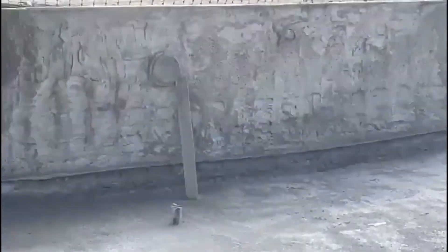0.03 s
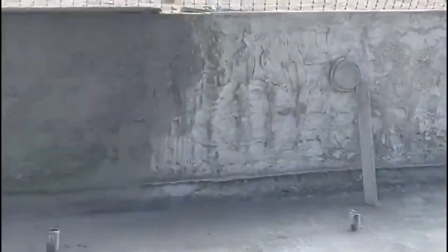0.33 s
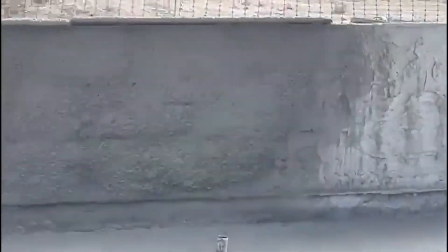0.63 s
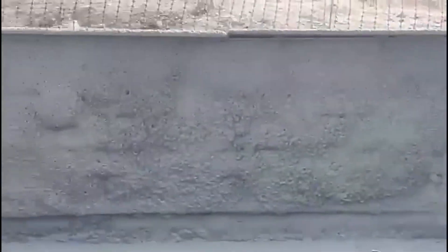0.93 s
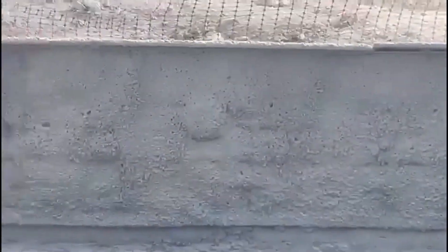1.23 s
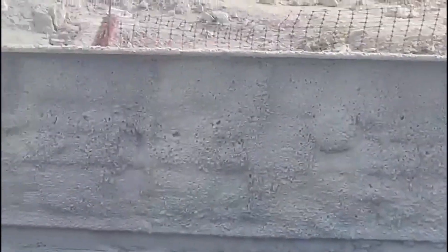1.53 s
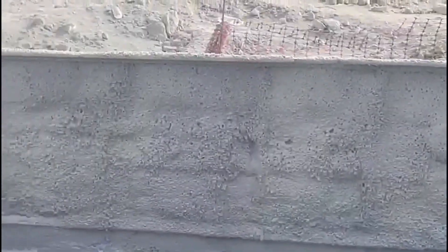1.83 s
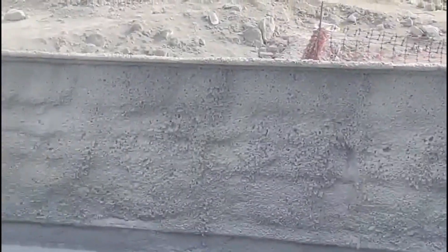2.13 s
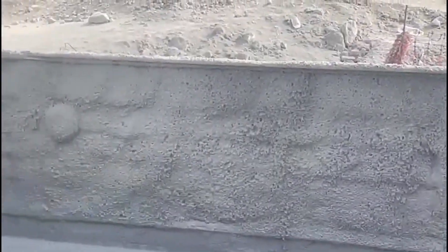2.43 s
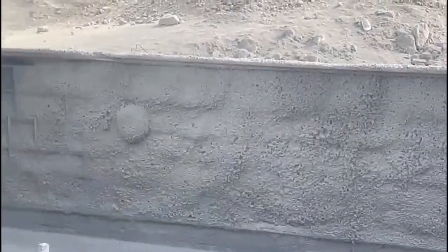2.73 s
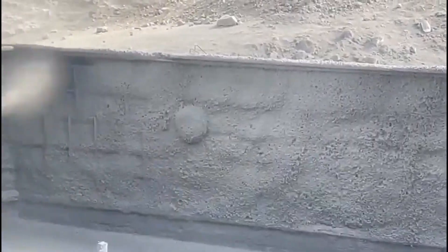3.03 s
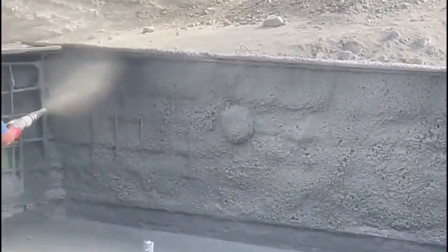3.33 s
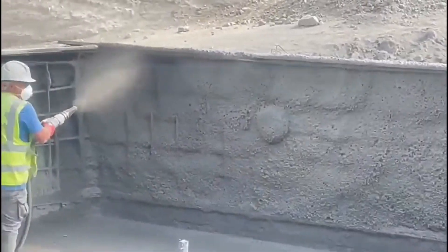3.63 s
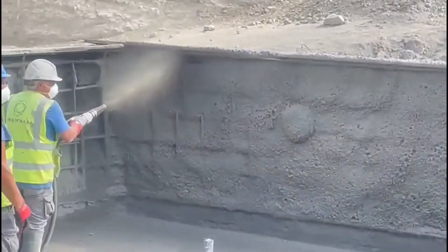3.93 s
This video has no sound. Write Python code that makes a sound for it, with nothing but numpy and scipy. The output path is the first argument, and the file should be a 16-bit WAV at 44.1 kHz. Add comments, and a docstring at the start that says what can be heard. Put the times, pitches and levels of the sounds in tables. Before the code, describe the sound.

Wet concrete sprays from a hose onto a wall in an outdoor pit, roaring and hissing. Lumps spit out with thuds, grit patters and the nozzle briefly whistles over a droning rig as the microphone turns towards it.

```python
"""In a pit, wet concrete is sprayed on a wall while the listener turns towards the nozzle.
The jet of air rumbles, roars and hisses, and makes the nozzle ring and whistle; the rig drones behind.
Wet mix churns through the hose and bursts out in lumps, each a quickly falling, thudding spit.
Grit patters and scuffs, clumps slap on the wall, and the pit throws the roar and the spits back."""
import sys
import numpy as np
from scipy import signal
from scipy.fft import rfft, irfft
from scipy.io import wavfile
from scipy.ndimage import uniform_filter1d, map_coordinates

SR = 44100
rng = np.random.default_rng(int(sys.argv[2]) if len(sys.argv) > 2 else 0)


def waveform_to_disk(signal):
    """Save audio, clipped to [-1, 1], as 16-bit WAV at the path in sys.argv[1]."""
    frames = np.transpose(np.atleast_2d(signal))
    scaled = np.clip(frames, -1, 1) * 32767
    samples = np.round(scaled).astype(np.int16)
    wavfile.write(sys.argv[1], SR, samples)


N = 176400
T = np.arange(N) / SR
HZ = np.fft.rfftfreq(N, 1 / SR)


def amp(db):
    """Turns decibels into a number to multiply a sound by."""
    return 10 ** (np.asarray(db) / 20)


def unit(x):
    """Scales a signal to an average strength (rms) of 1."""
    return x / np.sqrt(np.mean(x ** 2) + 1e-20)


def curve(table, column=1):
    """Joins the points in one column of a time table with straight lines."""
    rows = np.array(table)
    return np.interp(T, rows[:, 0], rows[:, column])


def add(mix, start_s, sound):
    """Mixes a sound in at its start time."""
    part = mix[max(round(start_s * SR), 0):][:len(sound)]
    part += sound[:len(part)]


def delay(x, ms):
    """Makes a sound arrive later."""
    return np.interp(T - ms / 1000, T, x)


def noise(gains):
    """Noise with a chosen share of each frequency."""
    return unit(irfft(rfft(rng.standard_normal(N)) * gains, N))


def wander(rate_hz):
    """A random wobble, up to about the given speed."""
    return noise(1 / (1 + (HZ / rate_hz) ** 4))


def band(hz, half_width_hz):
    """Noise gathered around one pitch."""
    return noise(1 / (1 + ((HZ - hz) / half_width_hz) ** 2))


# Pitches that the hose and pit boost or weaken (frequency [Hz], width [Hz], boost [dB])
RESONANCES = [(422, 58, 2.5), (548, 25, 4), (630, 91, 4.5), (804, 32, 2.5), (969, 45, 6),
              (1104.4, 28.5, 9.5), (1276, 44, 4.5), (1305, 42, 5), (1397, 120, -3.5), (1850, 97, -5),
              (2077, 46, -7), (2554, 100, 4.5), (3790, 140, 0), (4030, 140, -1.5), (5350, 140, 1)]
def colour(x, tone):
    """Shapes a sound by a tone table and by the hose and pit; its strength comes out as 1."""
    hz, db = np.transpose(tone)
    tone_db = np.interp(np.log(HZ + 1), np.log(hz), db)
    boost_db = sum(boost / (1 + (2 * (HZ - centre) / width) ** 2) for centre, width, boost in RESONANCES)
    return unit(irfft(rfft(x) * amp(tone_db + boost_db), N))


def rush(tone, shape=N):
    """Rushing noise in a given tone; shape (2, N) gives each ear its own."""
    return colour(rng.standard_normal(shape), tone)


def feed(slowest_hz=3.3, fastest_hz=48.3):
    """The mix comes through the hose in quick, uneven surges."""
    return noise(HZ ** 2 / (HZ ** 2 + slowest_hz ** 2) / (1 + (HZ / fastest_hz) ** 4))


# How strongly the jet flows (time [s], level change [dB])
FLOW = [(0, -2), (.35, -2), (.6, -0.5), (.95, -1), (1.25, 2), (1.45, 0), (1.7, 0.5), (2.05, 0.5),
        (2.16, -5), (2.35, 2.5), (2.68, 2.5), (2.85, -6.5), (3.15, -5.5), (3.35, -7.5), (3.53, 3),
        (3.7, -10), (4, -6)]
# Tone of the swirling air (frequency [Hz], relative level [dB])
RUMBLE_TONE = [(40, -36.5), (80, -0.5), (120, -2.5), (155, -2), (205, -1), (250, -9), (300, -24),
               (500, -37.5), (1500, -104)]
def rumble(level_db=-22.5, lumpy_db=2.06, side_db=-17, side_hz=170):
    """Swirling air rumbles with the flow; its higher part spreads out to both sides."""
    middle, side = rush(RUMBLE_TONE), rush(RUMBLE_TONE)
    spread = np.minimum((HZ / side_hz) ** 2, 5) * amp(side_db)
    side = irfft(rfft(side) * spread, N)
    return np.array([middle + side, middle - side]) * amp(level_db + curve(FLOW) + lumpy_db * wander(18))


# Deep gusts under the jet (time [s], level [dB])
GUST_LEVEL = [(0, -30.5), (.15, -28.5), (.27, -28.5), (.42, -28.5), (.58, -21), (.8, -24.5), (1.07, -32.5),
              (1.22, -22), (1.42, -24), (1.58, -26.5), (1.67, -16.5), (1.9, -33.5), (2.0, -24), (2.13, -23),
              (2.32, -19.5), (2.48, -23), (2.68, -12), (2.8, -37.5), (3.1, -26.5), (3.35, -27.5),
              (3.55, -21.5), (3.8, -27.5), (4, -27)]
# Tone of the gusts (frequency [Hz], relative level [dB])
GUST_TONE = [(20, -44), (33, -48.5), (50, -30), (65, -12.5), (90, -0.5), (120, 0), (150, -4.5), (200, -7.5),
             (400, -127)]
def gusts(lumpy_db=0.5):
    """Deep, lumpy air noise, the same in both ears."""
    return rush(GUST_TONE) * amp(curve(GUST_LEVEL) + lumpy_db * wander(25))


# The note of the rig (time [s], level [dB], pitch [Hz])
RIG_NOTE = [(0, -29.5, 177.7), (.16, -27, 180.2), (.23, -25.5, 179.5), (.41, -22.5, 179.6),
            (.52, -31, 183.6), (.9, -30, 180), (1.1, -24.5, 180.7), (1.32, -21.5, 186), (1.45, -28, 181.9),
            (1.59, -25.5, 189.9), (1.75, -29, 181.8), (2.05, -24.5, 179.7), (2.17, -37, 180),
            (2.6, -25.5, 177.3), (2.85, -36, 180.5), (3.1, -30, 183.3), (4, -31.5, 180)]
def rig_drone(waver=0.00754, overtone_db=-24.5, flutter_db=-0.5):
    """The rig hums a wavering low note, with a faint overtone at three times the pitch."""
    hz = curve(RIG_NOTE, column=2) * (1 + waver * wander(4.6))
    angle = 2 * np.pi * np.cumsum(hz) / SR
    hum = unit(np.sin(angle) + amp(overtone_db) * np.sin(3 * angle))
    return hum * amp(curve(RIG_NOTE) + flutter_db * wander(18))


def sag(x, fall_per_s=0.006):
    """Lets the pitches in a noise sink slowly as the listener turns."""
    bent_time = T + fall_per_s * T * (T[-1] - T) / 2
    return map_coordinates(x, [SR * bent_time], order=5, mode="mirror")


# High notes of the nozzle pipe (pitch [Hz], half-width [Hz], level [dB])
PIPE_NOTES = [(2965, 55, -47.5), (3170, 65, -49.5), (3605, 50, -50.5)]
# How loud they are as the listener turns (time [s], level change [dB])
PIPE_LEVEL = [(0, -5.5), (1, -6), (1.8, -2.5), (2.9, -3.5), (4, -4.5)]
def pipe(flutter_db=2.0):
    """Air sings in the nozzle pipe, each note fluttering on its own."""
    notes = sum(band(hz, width) * amp(db + flutter_db * wander(25)) for hz, width, db in PIPE_NOTES)
    return sag(notes) * amp(curve(PIPE_LEVEL))


# Bounces off the walls near the nozzle (starting delay [ms], strength [share of the direct sound])
WALL_BOUNCES = [(3.1, 0.14), (5.7, 0.24), (9.4, 0.062), (15.2, 0.4), (23, 0.18)]
def walls(x, drift_per_s=0.01498):
    """Adds quick bounces whose paths slowly lengthen as the listener moves."""
    return unit(x + sum(share * delay(x, ms * (1 + drift_per_s * T)) for ms, share in WALL_BOUNCES))


# The listener's turn (time [s], left ear's lead [ms], roar boost [dB], left minus right [dB])
TURN = [(0, 0.41, 8, -1.5), (.5, 0.39, 7.5, 2), (1.1, 0.28, 8, 3), (1.6, 0.22, 9, 1.5),
        (2.3, 0.14, 7.5, 1.5), (3, 0.09, 5, -2), (3.38, 0.078, 5, 1), (3.55, 0.048, 8, -0.5),
        (4, 0.06, 6, -3.5)]
# Tone of the spray on the wall (frequency [Hz], relative level [dB])
ROAR_TONE = [(150, -18), (300, -1), (450, 0), (560, -6.5), (700, 7), (900, 6), (1100, -5), (1400, 5),
             (1800, -3), (2050, 0), (2300, -32.5), (4000, -78.5)]
# Tone of its echo in the pit (frequency [Hz], relative level [dB])
ECHO_TONE = [(150, -30.5), (300, -23.5), (450, 1.5), (560, -8.5), (680, 5), (900, -12), (1100, -2.5),
             (1350, -7), (1750, -5), (2000, -9), (2250, -18.5), (3000, -36.5), (4000, -82.5)]
# How that echo builds up (time [s], level change [dB])
ECHO_LEVEL = [(0, -1.5), (1.6, 0), (4, 0)]
def roar(surge, level_db=-40, surge_db=1.88, echo_db=-34.5, echo_surge_db=0.1):
    """Spray and clumps beat on the wall, reaching the left ear first; a wash of echo fills the pit."""
    spray = walls(rush(ROAR_TONE)) * amp(level_db + curve(TURN, column=2) + surge_db * surge)
    spray += slaps()
    pan = amp(curve(TURN, column=3) / 2)
    direct = np.array([spray * pan, delay(spray, ms=curve(TURN)) / pan])
    echo = rush(ECHO_TONE, (2, N)) * amp(echo_db + curve(ECHO_LEVEL) + echo_surge_db * surge)
    return direct + echo


# Churning inside the hose (time [s], level [dB])
CHURN_LEVEL = [(0, -37), (.7, -37), (1.2, -43.5), (1.6, -38.5), (2.1, -37.5), (2.4, -32), (2.7, -39),
               (2.85, -38), (3.35, -49), (3.52, -27), (3.7, -51), (4, -64)]
# Tone of wet mix (frequency [Hz], relative level [dB])
WET_TONE = [(100, -20.5), (200, 5), (330, 2), (480, 3), (750, -2.5), (1300, -13), (2000, -13),
            (4000, -76.5)]
def churn(surge, surge_db=2):
    """Wet mix churns out of the hose, louder with each surge."""
    return rush(WET_TONE, (2, N)) * amp(curve(CHURN_LEVEL) + surge_db * surge)


NOZZLE_HZ = 1336
# Hollow ring of the nozzle (time [s], level [dB])
RING_LEVEL = [(0, -64), (.55, -50), (.72, -44), (1.15, -46.5), (1.7, -46), (2.3, -40), (3, -48), (4, -57)]
def ring(surge, surge_db=2):
    """Rushing air makes the nozzle ring around one pitch."""
    return band(NOZZLE_HZ, half_width_hz=99) * amp(curve(RING_LEVEL) + surge_db * surge)


# Tone of the hiss and grit, with the recorder's treble gap at about 7.6-9.5 kHz
# (frequency [Hz], relative level [dB])
HISS_TONE = [(1000, -16.5), (1800, -11), (2150, 6), (2900, -1), (3800, -1.5), (5200, -5.5), (6400, -10.5),
             (7350, -15.5), (7800, -66.5), (9200, -48.5), (9900, -20.5), (11500, -25), (12500, -38)]
# Tone of the thin treble band that the recorder adds (frequency [Hz], relative level [dB])
RECORDER_TREBLE = [(5500, -56), (6700, -19.5), (7100, 6.5), (8200, 6.5), (9500, 2), (10200, -16.5),
                   (11000, -30.5)]
def hiss(surge, level_db=-43, surge_db=0.66, flicker_db=1.15, treble_db=-60):
    """Escaping air gives a flickering hiss; the recorder adds thin treble, opposite in the two ears."""
    air = walls(sag(rush(HISS_TONE))) * amp(level_db + surge_db * surge + flicker_db * wander(43))
    treble = amp(treble_db) * rush(RECORDER_TREBLE)
    return np.array([air + treble, air - treble])


def grit(grains_per_s=1700, level_db=-46, spread_db=1.5):
    """Grains patter on the wall, each a tiny click at a random moment."""
    hits = rng.random(N) < grains_per_s / SR
    strength = amp(spread_db * np.minimum(rng.exponential(1, N), 4))
    clicks = hits * strength * rng.choice([-1, 1], N)
    return amp(level_db) * colour(clicks, HISS_TONE)


def burst(t, rise_s, fade_s):
    """A loudness shape that rises quickly and dies away."""
    return (1 - np.exp(-t / rise_s)) * np.exp(-t / fade_s)


def spit(db, size, top_hz=1250, end_hz=116, fall_s=0.0035, hose_hz=180, swell_s=0.017, boom_db=-10):
    """A lump leaves the hose: a chirp drops to a thud, slower and deeper if big, and the hose booms."""
    t = T[:SR // 10]
    hz = (end_hz + (top_hz - end_hz) * np.exp(-t / (fall_s * size))) / size
    shape = burst(t, rise_s=0.003, fade_s=0.016)
    chirp = shape / shape.max() * np.sin(2 * np.pi * (np.cumsum(hz) / SR + rng.random()))
    roughness = 1 + 0.16 * unit(uniform_filter1d(rng.standard_normal(len(t)), size=40))
    swell = (t / swell_s * np.exp(1 - t / swell_s)) ** 2
    boom = swell * np.sin(2 * np.pi * (hose_hz * t + rng.random()))
    return amp(db) * (chirp * roughness + amp(boom_db) * boom)


def sputter(lumps_per_s=60, level_db=-33.5, spread_db=4, size_spread=0.15, count=400):
    """Small lumps spit out at random, louder when the flow is strong."""
    out, flow_db = np.zeros(N), curve(FLOW)
    times = np.cumsum(rng.exponential(1, count)) / lumps_per_s
    for s in times[times < T[-1]]:
        strength, bulk = np.clip(rng.standard_normal(2), -2, 2)
        db = level_db + np.interp(s, T, flow_db) + spread_db * strength
        add(out, s, spit(db, size=np.exp(size_spread * bulk)))
    return out


def pit_echo(x, fade_s=1, bass_hz=300):
    """The pit smears a sound into a short echo, alike in both ears in the bass."""
    t = T[:SR // 2]
    fade = amp(-60 * t / fade_s) * (t > .004)
    middle, side = rfft(rng.standard_normal((2, len(t))) * fade, N)
    spread = np.pi / 4 / (1 + (bass_hz / (HZ + 1)) ** 4)
    middle, side = middle * np.cos(spread), side * np.sin(spread)
    tail = irfft([middle + side, middle - side], N)[:, :len(t)]
    return signal.fftconvolve(x[None], tail / np.linalg.norm(tail[0]), axes=1)[:, :N]


def bump(peak_s, width_s):
    """A smooth rise and fall around one moment."""
    return np.exp(-.5 * ((T - peak_s) / width_s) ** 2)


def squeak(peak_s, hz, db, width_s, waver_hz, rasp=0):
    """A brief, unsteady tone that swells and fades; rasp mixes noise into it."""
    angle = 2 * np.pi * np.cumsum(hz + waver_hz * wander(waver_hz)) / SR
    return amp(db) * bump(peak_s, width_s) * unit(np.sin(angle) + rasp * band(hz, 2 * waver_hz))


# Gritty squeaks of the mix (time [s], pitch [Hz], level [dB])
SCUFFS = [(.275, 2000, -39.5), (.32, 1950, -40.5), (.395, 2430, -39.5), (.437, 2540, -38),
          (.482, 1680, -41), (1.045, 2520, -42), (1.675, 2540, -40), (1.975, 2520, -40), (3.05, 2200, -38),
          (3.25, 2170, -39)]
def scuffs():
    """Grit rasps briefly, part tone and part noise."""
    return sum(squeak(s, hz, db, width_s=0.0084, waver_hz=130, rasp=0.4) for s, hz, db in SCUFFS)


# Big lumps leaving the nozzle (time [s], level [dB], size [1 = ordinary])
BIG_LUMPS = [(0.675, -21.5, 0.97), (1.18, -21, 1.26), (1.292, -23, 1.3), (1.501, -14.5, 0.9),
             (1.628, -18.5, 1.25), (1.674, -21.5, 1.2), (2.199, -11.5, 1.1), (2.343, -20, 0.97),
             (2.37, -16, 0.85), (2.447, -13.5, 1), (2.571, -16, 1.2), (2.65, -16, 0.84),
             (2.662, -16.5, 1.25), (2.725, -19, 0.79), (3.026, -26, .75), (3.149, -23, .85),
             (3.203, -25, .75), (3.459, -21, 0.93), (3.527, -20, 0.8), (3.551, -20, 0.88),
             (3.602, -23, 0.81), (3.918, -26, .85)]
def big_spits():
    """Each big lump bursts out with its own spit."""
    out = np.zeros(N)
    for s, db, size in BIG_LUMPS:
        add(out, s, spit(db, size))
    return out


def choke(dip_db=-5, lead_s=0.015, width_s=0.025):
    """A dip in level: each big lump blocks the hose just before it bursts out, the loudest most."""
    loudest_db = max(db for _, db, _ in BIG_LUMPS)
    blockage = sum(amp(db - loudest_db) * bump(s - lead_s, width_s) for s, db, _ in BIG_LUMPS)
    return amp(dip_db * blockage)


def splashes(relative_db=-16):
    """A short, wet splash follows each big lump."""
    level = np.zeros(N)
    for s, db, _ in BIG_LUMPS:
        add(level, s, amp(db + relative_db) * burst(T[:SR // 5], rise_s=0.0084, fade_s=0.06))
    return level * rush(WET_TONE, (2, N))


# Clumps of mix landing on the wall (time [s], level [dB])
SLAPS = [(0.681, -27), (2.824, -22.5), (2.863, -28), (2.942, -39), (3.005, -23), (3.148, -25),
         (3.229, -21.5), (3.451, -25)]
def slaps():
    """Clumps hit the wall, each a short swell of the roar."""
    level = np.zeros(N)
    for s, db in SLAPS:
        add(level, s, amp(db) * burst(T[:SR // 5], rise_s=0.003, fade_s=0.022))
    return level * rush(ROAR_TONE)


# Whistles of the nozzle (time [s], level [dB])
WHISTLES = [(.69, -41), (.785, -39.5), (.855, -35.5), (1.005, -34.5), (1.32, -33.5), (1.61, -33.5),
            (2.235, -39), (2.4, -35), (2.95, -34), (3.01, -44)]
def whistles():
    """Now and then the air in the nozzle breaks into a short whistle."""
    return sum(squeak(s, NOZZLE_HZ, db, width_s=0.012, waver_hz=25) for s, db in WHISTLES)


def scene():
    """Mixes everything; the roar, churn, ring and hiss surge together with the feed of the mix."""
    surge = feed()
    low_air = choke() * (gusts() + rumble())
    jet = pipe() + roar(surge) + churn(surge) + ring(surge) + hiss(surge) + whistles()
    spits = sputter() + big_spits()
    spits_from_left = np.array([spits, delay(spits, ms=0.45)])
    lumps = spits_from_left + splashes() + amp(-17.5) * pit_echo(spits)
    return low_air + rig_drone() + jet + grit() + scuffs() + lumps


def record(dry, cutoff_hz=11900):
    """The recorder cuts away the very highest treble."""
    low_pass = signal.firwin(511, cutoff_hz, window=("kaiser", 9), fs=SR)
    return signal.oaconvolve(dry, low_pass[None], "same")


dry = scene()
out = record(dry)
waveform_to_disk(out)
```